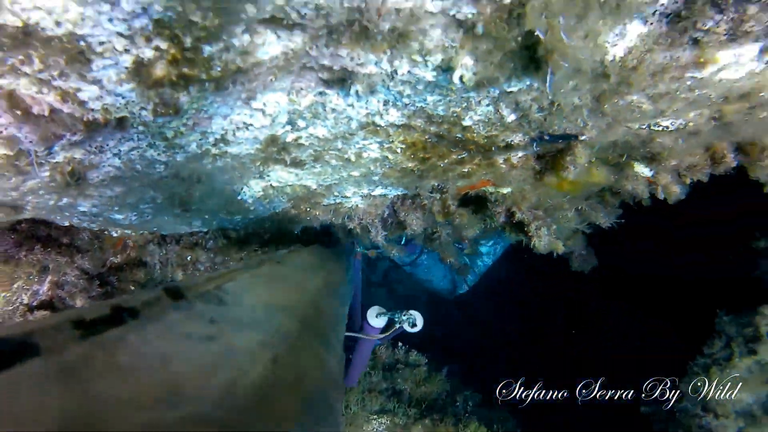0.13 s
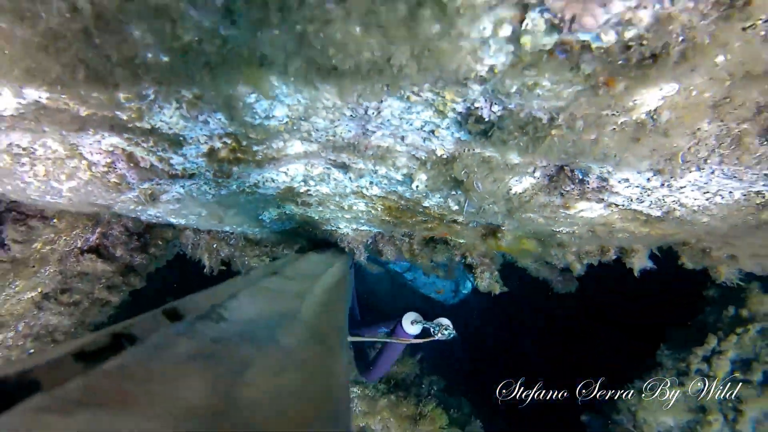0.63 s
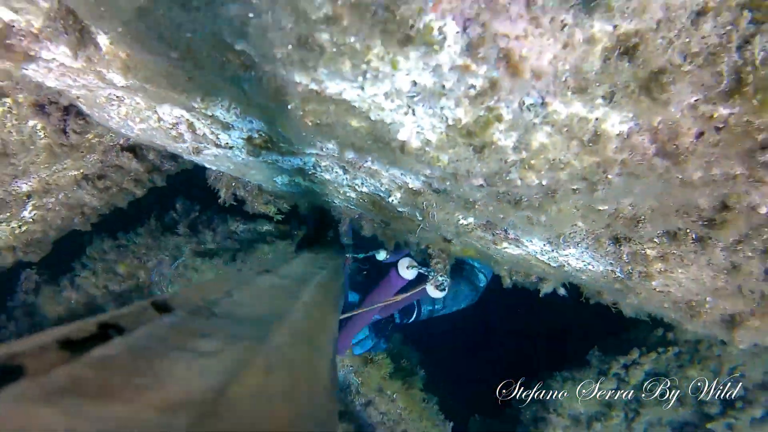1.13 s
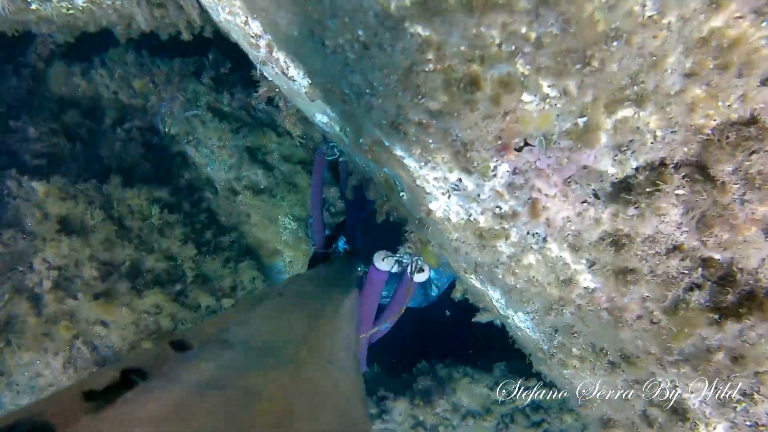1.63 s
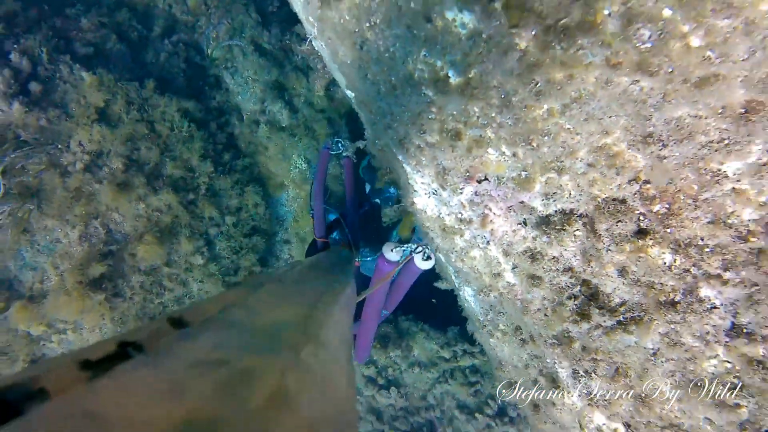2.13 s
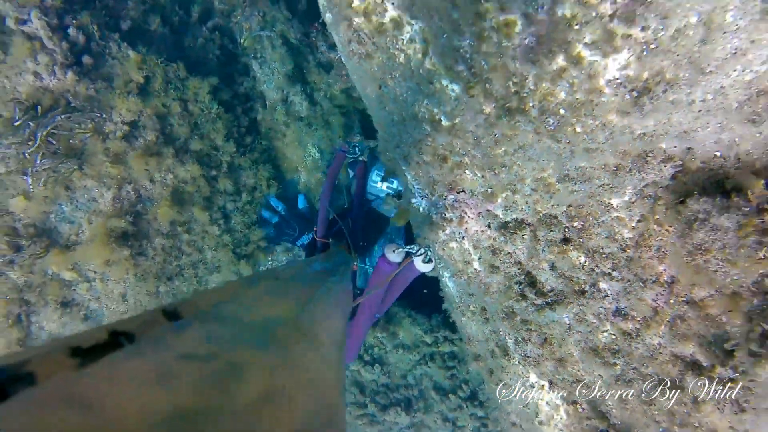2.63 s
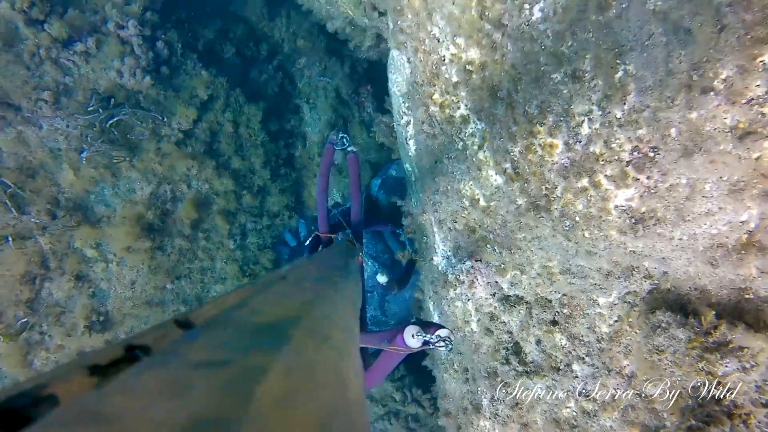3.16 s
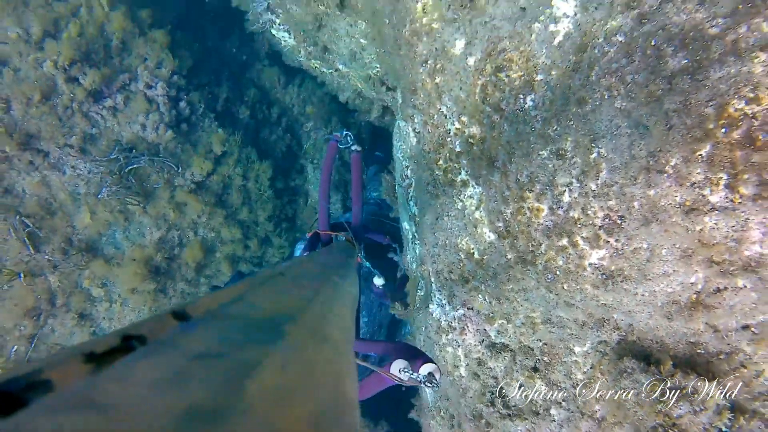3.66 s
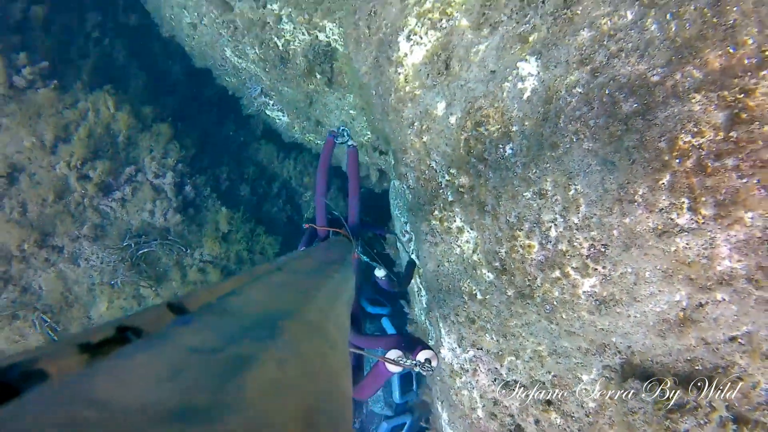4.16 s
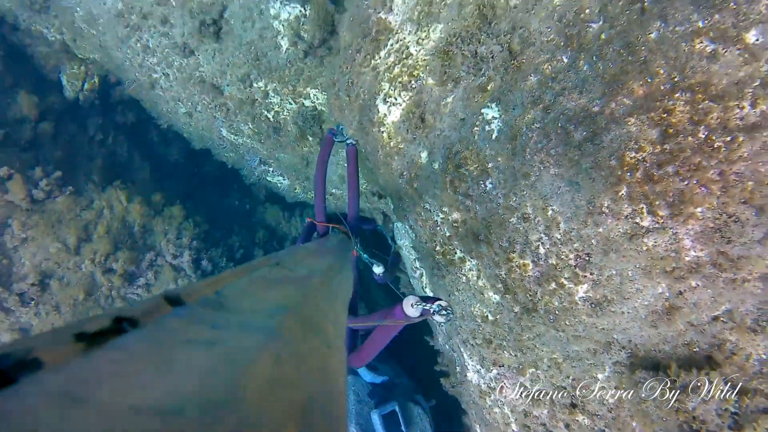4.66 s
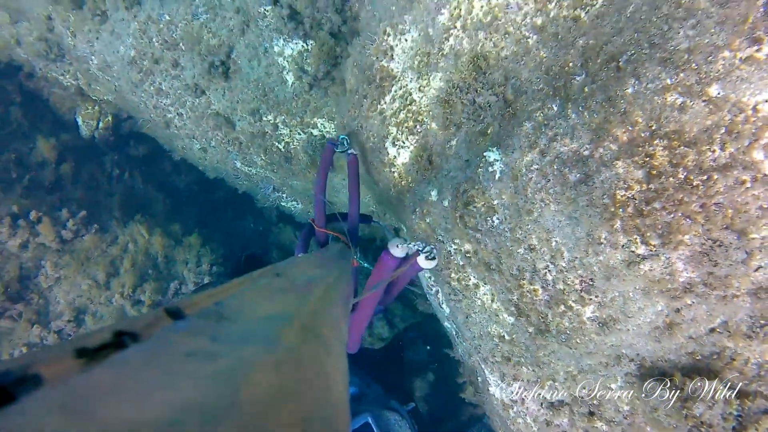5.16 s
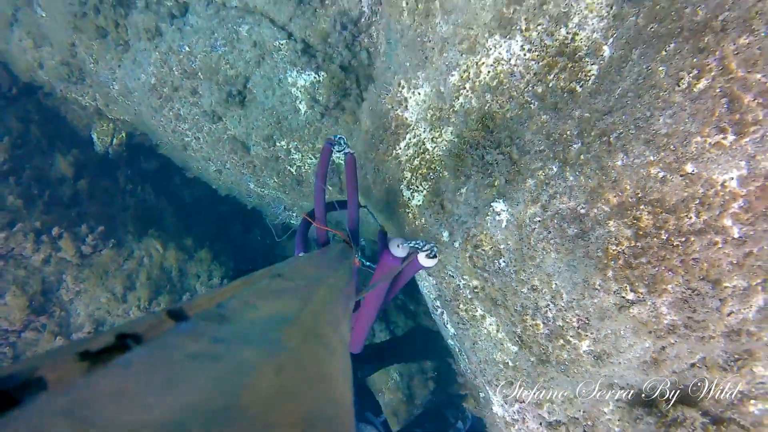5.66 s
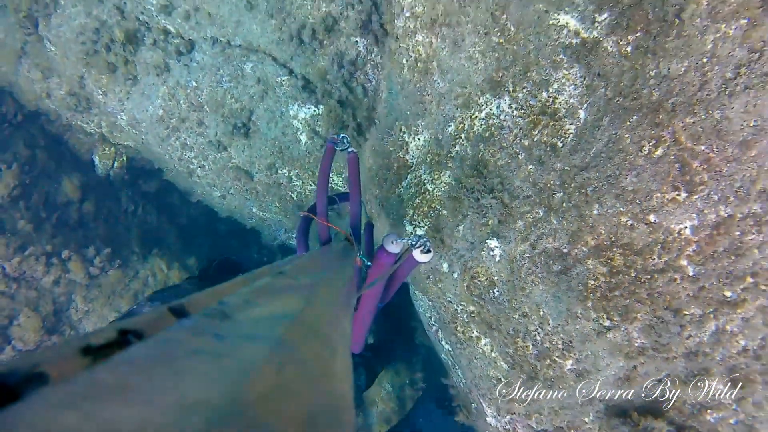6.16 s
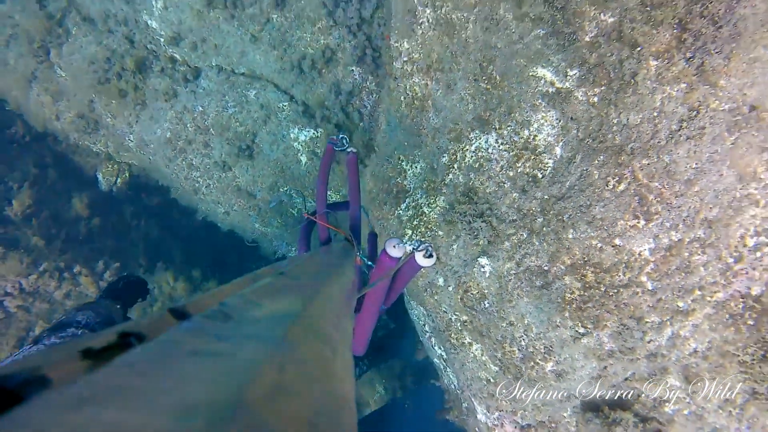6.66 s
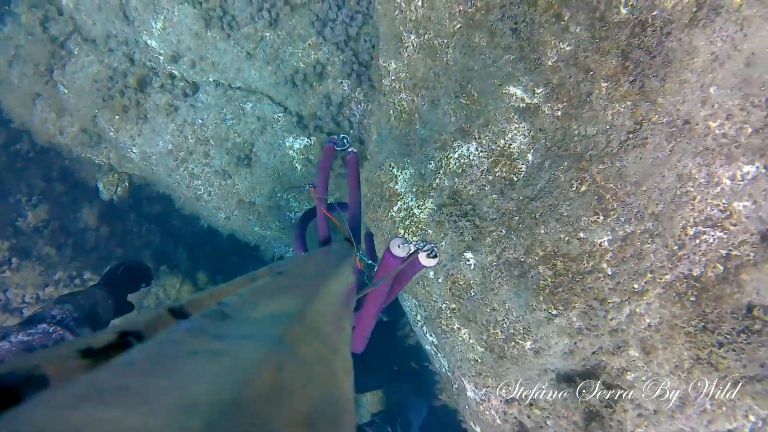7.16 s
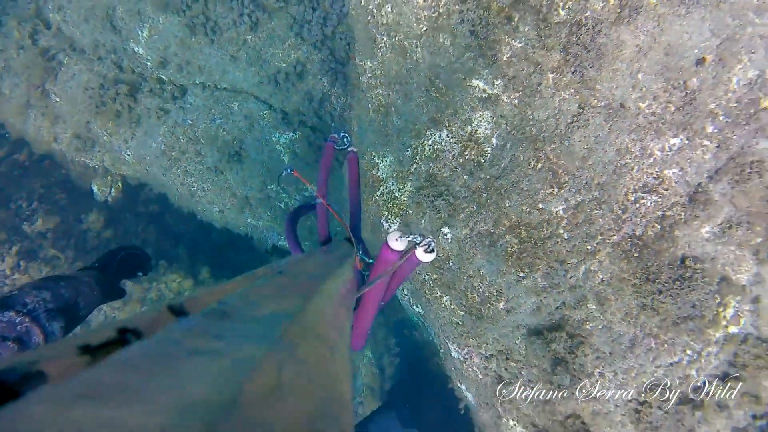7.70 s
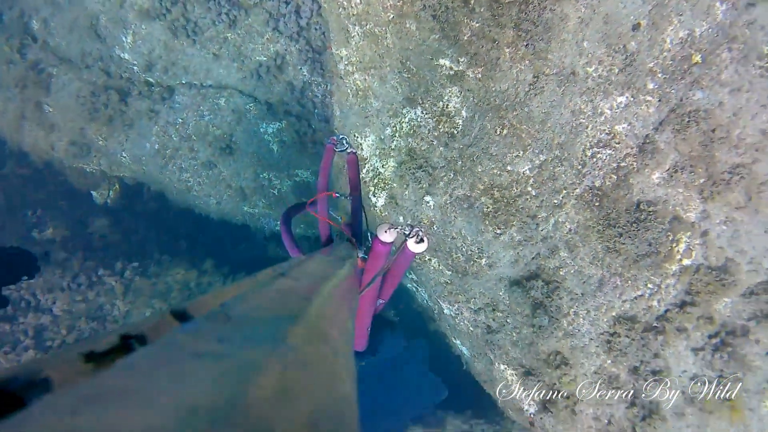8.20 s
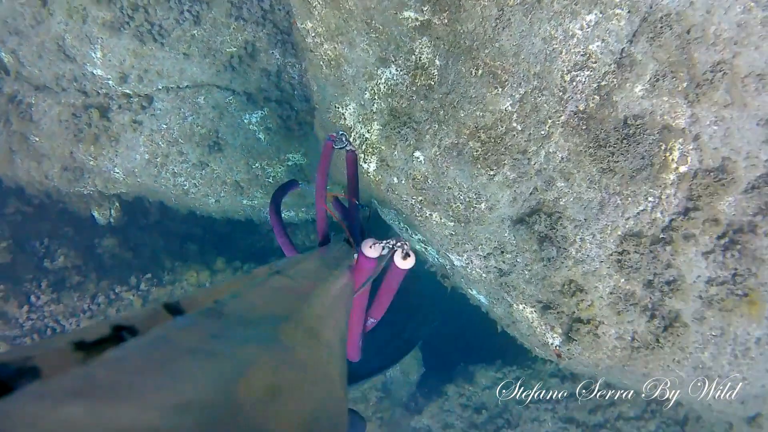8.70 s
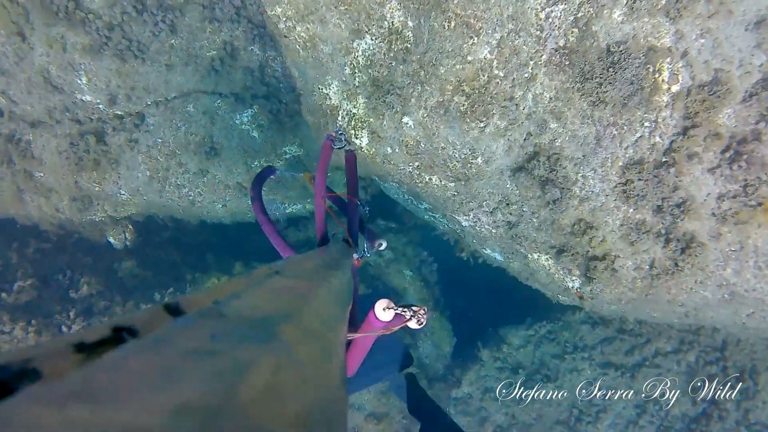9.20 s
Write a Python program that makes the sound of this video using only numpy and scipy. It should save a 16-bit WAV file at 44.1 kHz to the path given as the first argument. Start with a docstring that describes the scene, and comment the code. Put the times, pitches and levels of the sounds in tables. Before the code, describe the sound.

Underwater, low wavering throbs and thuds through a pole, with muffled knocks, gritty scrapes and small hard ticks over faint steady hiss.

```python
"""Low, wavering throbs and jolts come first, joined by dull knocks, scrapes, hard ticks and steady hiss.
Under water, a diver pushes a long pole carrying a microphone in a sealed case into a rock crevice.
Hand and water drive the pole's slow bending modes, as noise through resonators or as damped free swings.
Rubbing, scrapes, knocks and ticks are rough forces that ring the modes of case, walls and metal fittings.
The microphone amplifier adds shaped noise, and a hard ceiling clips the biggest swings."""
import sys
import numpy as np
from scipy import signal
from scipy.fft import rfft, irfft, next_fast_len
from scipy.io import wavfile
from scipy.ndimage import map_coordinates

SR = 44100
rng = np.random.default_rng(int(sys.argv[2]) if len(sys.argv) > 2 else 0)


def master(y):
    """Save y as 16-bit WAV."""
    cut = np.clip(np.atleast_2d(y).T, -1, 1)
    pcm = np.round(cut * 32767)  # scale
    wavfile.write(sys.argv[1], SR, pcm.astype(np.int16))


def boost_factor(decibels):
    """Convert a level in decibels to a linear amplitude factor."""
    exponent = np.asarray(decibels, float) / 20
    return 10 ** exponent


N = 411009  # length in samples

# steady shaking of the pole by hand and water, mean levels before a random wobble:
# time_s, first_bend_db, second_bend_db, upper_bends_db
POLE_SHAKING = [(0, -61, -61, -60), (.2, -49.5, -67, -76), (.55, -41.5, -50, -69), (.8, -34, -31, -49),
                (1.1, -31, -40.5, -48), (1.55, -36, -40.5, -57.5), (1.76, -42, -51, -61),
                (1.9, -58, -58, -74), (2.2, -56, -77, -63), (2.55, -44.5, -48, -59.5),
                (3.05, -45.5, -54, -52.5), (3.35, -55.5, -74, -78), (3.55, -42.5, -40.5, -50.5),
                (4.02, -39, -59, -52.5), (4.2, -54.5, -67.5, -70), (4.95, -41.5, -56.5, -51.5),
                (5.45, -61, -66, -69.5), (5.8, -51, -62, -63), (6.88, -60, -72, -67.5),
                (7.0, -48.5, -51, -55), (7.3, -46.5, -65.5, -50.5), (7.6, -51.5, -61, -59),
                (8.2, -44, -52, -56), (8.55, -59.5, -81, -66.5), (8.85, -49, -56.5, -79),
                (9.0, -63.5, -70, -71), (9.32, -64, -73, -68)]
# bending modes of the pole in three groups, widths before damping: pitch_hz, width_hz, relative_level_db
BENDING_MODES = [
    [(32.4, 15, -6.5), (51, 21, 6), (65, 6.3, -19)],
    [(91.76, 5.2, 0.5)],
    [(166.6, 15.3, -0.5), (197.6, 10.5, -4.5), (239.8, 28, -6.5)],
]
# jolts that leave the pole swinging freely, levels before the relative mode levels:
# start_s, first_bend_db, second_bend_db, upper_bends_db
POLE_JOLTS = [(0.03, -44, -39, -74), (0.23, -33.5, -35, -49), (0.472, -31, -58, -55),
              (0.601, -22, -25.5, -45), (0.699, -33, -34, -47), (0.797, -24, -29, -35.5),
              (0.917, -24.5, -31.5, -39), (1.031, -19.5, -56, -44), (1.114, -31, -28, -47),
              (1.19, -37, -32, -43), (1.3, -52, -46, -40.5), (1.5, -49, -26.5, -59),
              (2.222, -56, -47, -38.5), (2.28, -44, -45.5, -57), (2.579, -48, -35, -38.5),
              (2.7, -44, -26, -27), (2.988, -29, -49, -41.5), (3.06, -33.5, -54, -52),
              (3.507, -37, -34.5, -33.5), (3.807, -42, -57, -53), (3.97, -38, -45, -44),
              (4.6, -34, -47, -41.5), (4.837, -53, -48, -38.5), (4.923, -46, -47, -57),
              (5.1, -49, -46.5, -70), (5.571, -42.5, -60, -49.5), (5.65, -39, -58, -52),
              (5.911, -52, -60, -66), (6.424, -39, -64, -51.5), (6.534, -37, -65, -58),
              (6.934, -41, -56, -35), (7.182, -36.5, -53, -48), (7.445, -44, -51, -42),
              (7.717, -35.5, -42.5, -59), (7.822, -37, -50, -42.5), (7.921, -38, -65, -54),
              (8.13, -51, -53, -48), (8.249, -38, -47, -43.5), (8.375, -17, -40, -31),
              (8.717, -38, -58, -70)]
# dull knocks, the wall level relative to the peak: start_s, peak_db, wall_db, contact_ms
DULL_KNOCKS = [(0.079, -50.5, -0.5, 8), (.514, -37.5, -27, 6.5), (.943, -39.5, -8.5, 7.1),
               (.986, -39, -10, 10), (1.022, -37.5, -15, 21), (1.095, -40.5, -18, 5),
               (1.186, -39.5, -16, 7), (1.259, -36.5, -8, 4.4), (1.287, -36, -8, 7), (1.304, -35, -11, 6.8),
               (1.329, -38, -19, 6.5), (1.341, -36, -16, 5.8), (1.663, -40, -16, 3),
               (2.073, -37.5, -34, 13), (2.226, -39, -16, 9.8), (2.244, -33.5, -12, 4),
               (2.304, -47, -15, 5.4), (2.404, -47, -26, 2), (2.534, -38, 5, 20), (2.591, -33.5, -5, 6),
               (2.708, -35, -36, 12), (2.741, -33, -20, 10), (2.764, -35, -27, 7.1),
               (2.995, -36.5, -7.5, 5.8), (3.486, -43, -12, 9.8), (3.525, -31, -16, 19),
               (3.568, -49, 0, 6.6), (3.614, -33, -21, 5), (3.656, -36.5, -29, 16), (3.807, -41, -12, 12),
               (3.922, -43.5, -3.5, 4.9), (3.952, -39.5, -18, 3.6), (4.4, -54.5, 3, 4),
               (4.445, -39.5, -11, 13), (4.836, -39.5, -13, 15), (5.647, -36, -21, 10.3),
               (5.726, -43, -9, 9.2), (5.791, -41, -30, 7), (6.007, -39.5, -9.5, 2.2),
               (6.165, -37, -15, 6.4), (6.369, -40.5, -15, 13), (6.929, -31, -15.5, 3.6),
               (6.946, -30, -28, 3.4), (6.979, -32, -12, 10), (6.991, -31, -11, 12), (7.025, -37, -16, 16),
               (7.099, -39.5, -14, 15), (7.275, -39, -7, 17), (7.301, -39, -6, 7), (7.42, -40.5, -28, 14),
               (7.644, -63, -22, 2.3), (8.097, -38, -11, 10), (8.242, -30, -18, 12),
               (8.253, -29.5, -26, 10), (8.267, -32.5, 3, 7.1), (8.289, -30, -9, 4), (8.322, -25, -11, 26),
               (8.343, -19, -12, 2.1), (8.376, -23.5, -16, 5), (8.383, -20, -24, 1.8),
               (8.425, -45, -34, 3.3), (8.534, -46, -31, 3.7), (9.206, -42, -16, 12)]
# hard ticks, the level before brightness shares it out: start_s, level_db, brightness (0-1)
HARD_TICKS = [(0.0791, -36.5, 0.8), (0.471, -49, 0.9), (.6956, -46, 0.78), (1.259, -54, 0.4),
              (1.269, -46, .15), (1.284, -49, 0.37), (1.304, -47.5, 0.3), (1.324, -50, .4),
              (1.332, -55, 0.5), (1.686, -54, 0.8), (2.2242, -59, 0.2), (2.2347, -55, 0.3),
              (2.5805, -49, 0.7), (2.594, -49, 0.3), (2.642, -41.5, 0.73), (2.7611, -53, .8),
              (3.214, -54.5, 1), (3.819, -56, .05), (3.85, -45.5, 1), (3.86, -52, 1), (3.906, -57, .2),
              (3.971, -59, 0.2), (3.991, -57, 0.2), (4.39, -54, 0.17), (4.462, -60, 0.3), (4.862, -50, 0.8),
              (5.5887, -49, 0.6), (6.212, -57, 0.9), (6.3873, -45, 0.5), (6.4223, -41, 0.66),
              (6.553, -45.5, 0.47), (6.9916, -53, .6), (7.091, -49, 0.3), (7.228, -41.5, 0.44),
              (7.247, -48, .5), (7.28, -48, 0.4), (7.299, -49, 0.5), (7.313, -51.5, 1), (7.4064, -55, 1),
              (7.8161, -49, 0.7), (8.2397, -56, 0.6), (8.269, -46, 0.84), (8.2887, -41.5, 0.04),
              (8.323, -39, 0.2), (8.337, -21, 0.15), (8.3404, -33, 0.3), (8.383, -48.5, 0.8),
              (8.473, -50, 0.84), (8.48, -56, .9), (8.985, -53.5, .95)]
# short gritty scrapes over rock, levels before the stroke's swell: middle_s, length_ms, case_db, wall_db
ROCK_SCRAPES = [(1.29, 70, -47, -58), (1.69, 130, -51, -67), (2.046, 45, -48.5, -67),
                (2.237, 43, -47.5, -54.5), (2.546, 58, -41.5, -57.5), (2.588, 16, -43, -55.5),
                (2.75, 140, -41.5, -83), (2.961, 47, -41.5, -77), (3.418, 28, -53.5, -66.5),
                (3.58, 136, -42, -62.5), (3.86, 22, -45.5, -66), (4.278, 8.8, -48.5, -80),
                (4.42, 130, -53, -70), (4.589, 78, -53.5, -77), (5.91, 59, -48.5, -66),
                (6.26, 67, -59.5, -80), (6.393, 13, -44, -70), (6.42, 40, -55, -67), (6.551, 113, -47, -75),
                (6.915, 32, -50.5, -67), (6.99, 104, -48, -60.5), (7.238, 62, -47, -61),
                (7.295, 64, -47, -66), (8.256, 25, -48, -55), (8.387, 25, -37, -55),
                (8.442, 47, -43.5, -67)]
# rubbing on rock and grip: time_s, rub_db, grittiness_db
RUBBING_LEVELS = [(0, -59.5, -92), (.5, -63.5, -82), (.75, -59.5, -72), (1.3, -53.5, -70.5),
                  (1.79, -59.5, -82), (2, -57.5, -71.5), (2.25, -50.5, -75), (2.55, -64.5, -75),
                  (2.73, -45.5, -63), (3, -48.5, -70), (3.1, -63.5, -80), (3.38, -63, -83),
                  (3.55, -48.5, -75), (3.97, -51, -65.5), (4.25, -61, -80), (4.55, -51.5, -69.5),
                  (5.5, -56.5, -71), (6.5, -51.5, -64), (6.88, -57, -75), (7.1, -50.5, -64.5),
                  (7.8, -52, -69.5), (8.4, -48, -66.5), (8.49, -65.5, -82.5), (9.32, -63.5, -78)]
# modes of the case, widths before damping: pitch_hz, width_hz, relative_level_db
CASE_MODES = [(260, 74, -14.5), (345, 17, -9.5), (394.5, 43, -7.5), (537, 21, -1.5), (588.3, 37, -3.5),
              (636.7, 36, 2.5), (713.3, 46, -4), (820, 95, -10.5), (925, 104, -17)]
# modes of the thin case walls, widths before damping: pitch_hz, width_hz, relative_level_db
WALL_MODES = [(1010, 38, 9), (1424, 200, 3), (2087, 530, -1.5), (2246, 89, 5.5), (2650, 146, -11),
              (3760, 440, -7.5), (4570, 160, -18.5)]
# modes of the small metal fittings: pitch_hz, width_hz, relative_level_db
FITTING_MODES = [(2500, 59, 8.5), (3170, 790, 9.5), (4260, 2030, 12), (4800, 700, 15.5), (6050, 990, -2.5)]
# spectrum of the steady floor, case murmur under amplifier hiss: pitch_hz, relative_level_db
HISS_SPECTRUM = [(180, -55), (300, -18), (602, -7.5), (880, -32), (941, -20), (2900, -29.5), (3370, -32),
                 (15700, -31.5)]


def pole():
    """Forced vibration: each group of bends follows its shaking, which softly rattles the case in its mount."""
    shaking = curves(POLE_SHAKING)
    sizes = [boost_factor(level_db + uneven_db * wobble(8)) for level_db, uneven_db in zip(shaking, [1.5, 2, 2.5])]
    bends = np.zeros(N)
    for size, modes, steady in zip(sizes, BENDING_MODES, [.6, .6, .3]):
        bends += size * bend(modes, steady)
    rattle = unit(rung(slips(200, 9.4, 0.34), CASE_MODES, soft_hz=486))
    return bends + sizes[0] * boost_factor(-18) * rattle


def bend(modes, steady):
    """Resonance under random pushes; steady (0-1) evens out the envelope of the swing."""
    hz, width, db = np.transpose(modes)
    swing = rung(rng.standard_normal(N), modes, soft_hz=362)
    broad_pass = [(hz.mean(), 1.47 * width.sum(), 0)]
    swing = rung(swing, broad_pass, soft_hz=362)
    envelope = np.abs(signal.hilbert(unit(swing), next_fast_len(N)))[:N]
    return unit(swing / (envelope + 0.89) ** steady)


def blows():
    """Free vibration: a jolt sets every bend swinging, with less damping than the rubbed pole."""
    rise_s, drag = 0.0065, 2.6  # wide swings lose more to the water
    out, t = np.zeros(N + SR), np.arange(SR // 2) / SR
    rise = (1 - np.exp(-t / rise_s)) ** 2
    for s, *levels in POLE_JOLTS:
        for level_db, modes, damping in zip(levels, BENDING_MODES, [.45, .65, .65]):
            loss = damping * (1 + drag * boost_factor(level_db))
            swing = np.zeros(len(t))
            for hz, width, db in modes:
                decay = np.exp(-np.pi * loss * width * t)
                swing += boost_factor(db) * decay * np.sin(2 * np.pi * hz * t)
            out[round(s * SR):][:len(t)] += boost_factor(level_db) * swing * rise
    return out[:N]


def knocks():
    """Impact excitation: the case booms and its walls rattle from each dull contact."""
    # the main mode of the case is favoured over its others by 9 dB
    case_hits = [(s, db, ms, -9) for s, db, wall_db, ms in DULL_KNOCKS]
    wall_hits = [(s, db + wall_db, 0.61 * ms, 0) for s, db, wall_db, ms in DULL_KNOCKS]
    boom = struck(case_hits, CASE_MODES, edge_ms=0.72, damping=1.36, rise_ms=1.6)
    return boom + struck(wall_hits, WALL_MODES, edge_ms=0.43, tilt_db=-0.5)


def ticks():
    """Short impacts excite high modes: bright ticks ring and rattle the fittings, duller ones the walls."""
    bright = [(s, db + 20 * np.log10(np.clip(b, .02, 1))) for s, db, b in HARD_TICKS]
    dull = [(s, db + 20 * np.log10(np.clip(1 - b, .02, 1))) for s, db, b in HARD_TICKS]
    fitting_hits = [(s, db, 1.5, 0) for s, db in bright]
    wall_hits = [(s, db, 1.8, 5) for s, db in dull]
    rattle_hits = [(s, db - 8, 11, 0) for s, db in bright]
    snap = struck(fitting_hits, FITTING_MODES, edge_ms=0.14)
    snap = snap + struck(wall_hits, WALL_MODES, edge_ms=0.11, tilt_db=5.5, damping=1.8)
    rattle = struck(rattle_hits, FITTING_MODES, edge_ms=0.13)
    # weak ticks come in clumps, stronger where the rubbing is gritty
    grit_db = curves(RUBBING_LEVELS)[1]
    clumps = slips(250, 4, 0.8) * boost_factor(3.0 * wobble(25) + 2.5 * wobble(7) + .3 * grit_db)
    return snap + rattle + boost_factor(-80.0) * unit(rung(clumps, FITTING_MODES, soft_hz=9400))


def scrapes():
    """Dense stick-slip: grit swells and fades under each short stroke and also rattles the fittings."""
    t = np.arange(N) / SR
    force = slips(700, 4.5, .4) * boost_factor(3 * wobble(120))
    case = rung(force, CASE_MODES, soft_hz=3180)
    fittings = unit(rung(force, FITTING_MODES, soft_hz=9500))
    wall = unit(rung(force, WALL_MODES, soft_hz=8600)) + boost_factor(-14) * fittings
    out = np.zeros(N)
    for s, ms, case_db, wall_db in ROCK_SCRAPES:
        middle, reach = round(s * SR), round(ms / 1000 * SR)
        near = slice(middle - reach, middle + reach)
        stroke = np.exp(-(2000 * (t[near] - s) / ms) ** 2)
        out[near] += stroke * (boost_factor(case_db) * unit(case[near]) + boost_factor(wall_db) * unit(wall[near]))
    return out


def rubbing():
    """Stick-slip friction: one stuttering force shakes both the case and its thin walls."""
    rub_db, grit_db = curves(RUBBING_LEVELS)
    force = slips(260, 4.46, 0.6) * boost_factor(2.5 * wobble(14) + 2.2 * wobble(50))
    case = unit(rung(force, CASE_MODES, soft_hz=1820))
    wall = unit(rung(force, WALL_MODES, soft_hz=5900))
    return boost_factor(rub_db) * case + boost_factor(grit_db) * wall


def amplifier_hiss():
    """Random noise shaped by the floor's spectrum, at about -66.5 dB."""
    hz, db = np.transpose(HISS_SPECTRUM)
    hiss = filtered(rng.standard_normal(N), lambda f: boost_factor(np.interp(np.log(f + 1), np.log(hz), db)))
    return boost_factor(-66.5 + 0.45 * wobble(7) + 0.37 * wobble(23)) * unit(hiss)


def struck(events, modes, edge_ms, tilt_db=0, damping=1, rise_ms=.01):
    """Modal impact: each (start_s, peak_db, contact_ms, side_modes_db) chatters and rings damped modes."""
    # edge_ms rounds every jolt, tilt_db per octave brightens, damping widens modes, rise_ms softens the start
    first_touch = 1.3  # first jolt of a contact against all the chatter after it
    out, t = np.zeros(N + SR), np.arange(SR // 5) / SR
    hz, width, mode_db = np.transpose(modes)[:, :, None]
    width = width * damping
    sign = (-1) ** np.arange(len(modes))[:, None]  # neighbouring modes move in opposition
    edge = np.sin(np.pi * np.clip(t[:200] / (edge_ms / 1000), 0, 1)) ** 2
    rise = 1 - np.exp(-1000 * t / rise_ms)
    for s, db, ms, side_db in events:
        # each hit finds the modes at slightly different levels and pitches
        tone_db = mode_db + side_db * (mode_db < mode_db.max()) + rng.normal(0, 2.2, hz.shape)
        tone_hz = hz * (1 + .03 * rng.standard_normal(hz.shape))
        gain = sign * boost_factor(tone_db + tilt_db * np.log2(hz / hz[0])) * width
        decay = np.exp(-np.pi * width * t)
        ring = np.sum(gain * decay * np.sin(2 * np.pi * tone_hz * t), axis=0)
        contact = t / (ms / 1000 + 1e-4)
        chatter = rng.standard_normal(len(t)) * np.exp(-contact ** 2)
        chatter[0] = first_touch * np.sqrt(ms / 1000 * SR)
        force = signal.fftconvolve(chatter, edge)
        hit = signal.fftconvolve(force, ring)[:len(t)] * rise
        out[round(s * SR):][:len(t)] += boost_factor(db) * hit / np.abs(hit).max()
    return out[:N]


def rung(force, modes, soft_hz):
    """Modal resonance: a force drives damped modes; a soft contact loses the pitches above soft_hz."""
    def response(f):
        body = 0
        for k, (hz, width, db) in enumerate(modes):
            loss = 1j * f * width
            body = body + (-1) ** k * boost_factor(db) * loss / (hz * hz - f * f + loss)
        return body / (1 + 1j * f / soft_hz) ** 4
    return filtered(force, response)


def slips(per_second, spread_db, fine):
    """Rough contact: sparse jolts of uneven size and random direction over a fine, dense noisy push."""
    size_db = spread_db * np.clip(rng.standard_normal(N), -2, 2)
    happens = rng.random(N) < per_second / SR
    jolts = happens * boost_factor(size_db) * np.sign(rng.standard_normal(N))
    return unit(jolts) + fine * rng.standard_normal(N)


def filtered(x, response):
    """Linear filtering: the spectrum of x times a complex response of frequency."""
    m = next_fast_len(N + SR // 2)
    return irfft(rfft(x, m) * response(np.fft.rfftfreq(m, 1 / SR)), m)[..., :N]


def wobble(rate):
    """Slow random modulation: a smooth curve through rate random knots a second."""
    knots = rng.standard_normal(int(N * rate / SR) + 4)
    return map_coordinates(knots, [np.arange(N) * rate / SR])


def curves(rows):
    """Linear interpolation: one value per sample for each column after the time."""
    s, *cols = np.transpose(rows)
    return [np.interp(np.arange(N) / SR, s, c) for c in cols]


def unit(x):
    """Normalisation by mean power: x scaled to rms 1."""
    return x / np.sqrt(np.mean(x ** 2) + 1e-20)


def scene():
    """Superposition: every vibration reaches the microphone through the case."""
    return (pole() + blows() + knocks() + ticks() + scrapes() + rubbing())[None]


def top_cut(x):
    """Nothing passes above the cut-off."""
    return signal.sosfilt(signal.butter(12, 15870, fs=SR, output="sos"), x)


def record(dry):
    """Saturation: a hard ceiling holds the swings, then amplifier hiss and a small constant offset add."""
    ceiling = .102  # share of full scale
    held = dry / (1 + np.abs(dry / ceiling) ** 16) ** (1 / 16)
    mix = held + amplifier_hiss() + .0023
    return top_cut(mix)


dry = scene()
out = record(dry)
master(out)
```